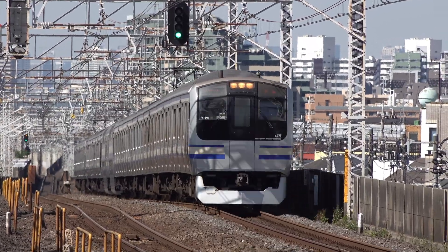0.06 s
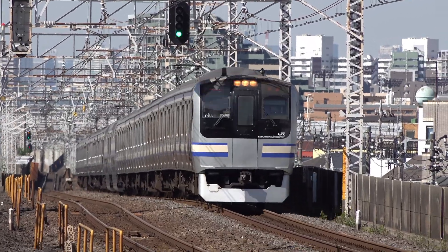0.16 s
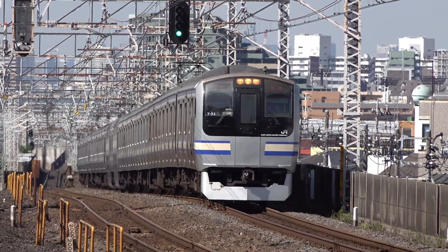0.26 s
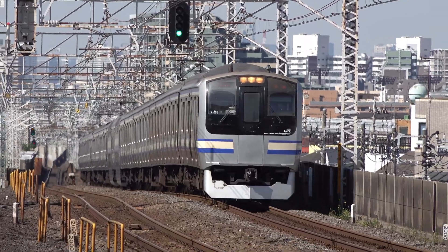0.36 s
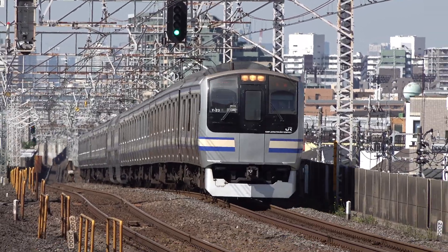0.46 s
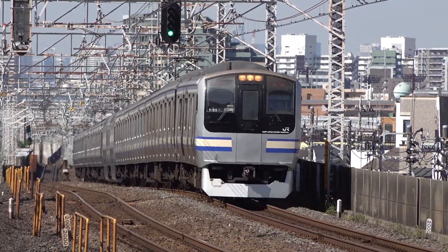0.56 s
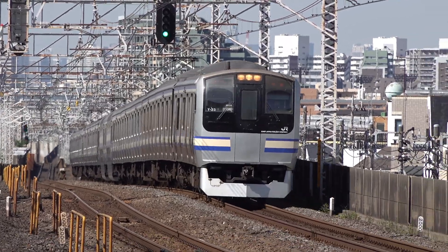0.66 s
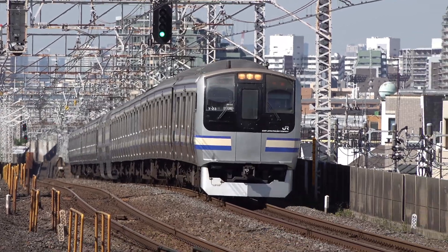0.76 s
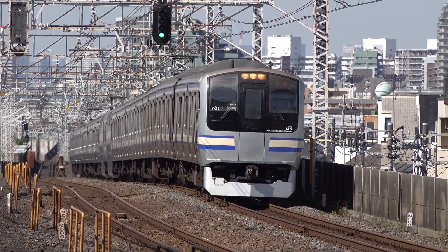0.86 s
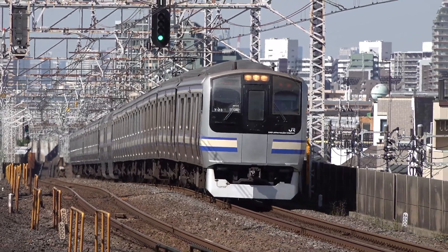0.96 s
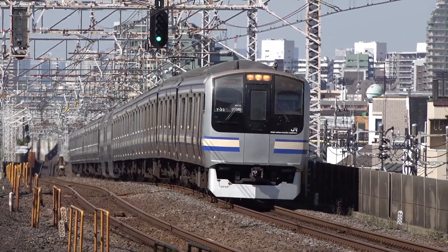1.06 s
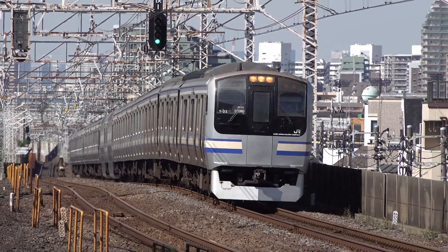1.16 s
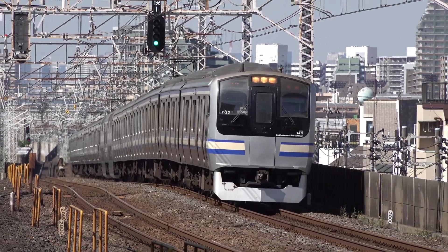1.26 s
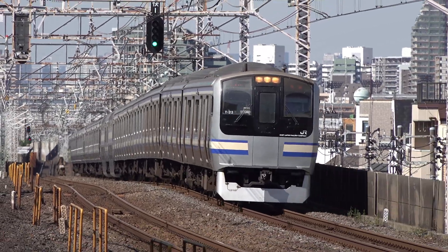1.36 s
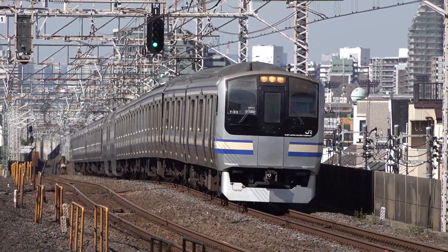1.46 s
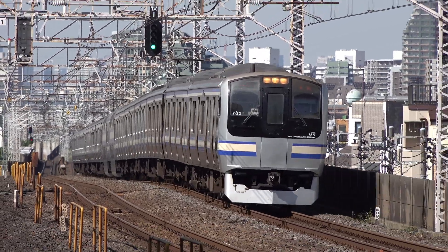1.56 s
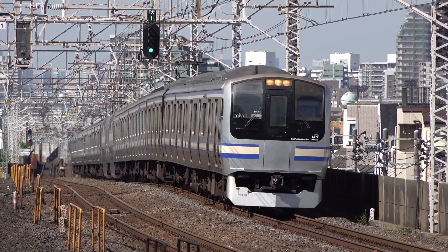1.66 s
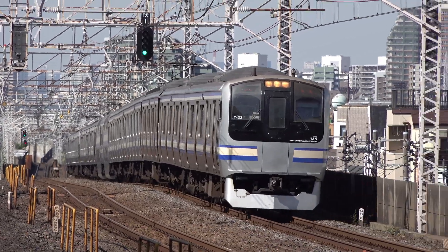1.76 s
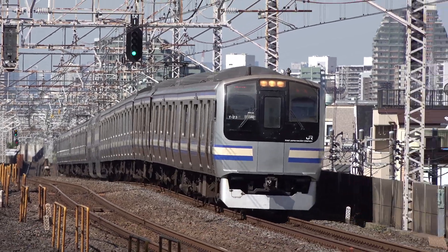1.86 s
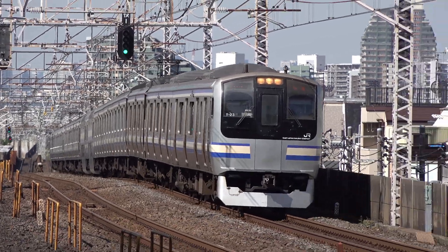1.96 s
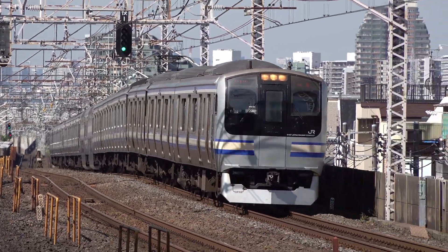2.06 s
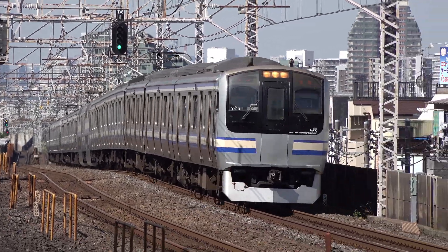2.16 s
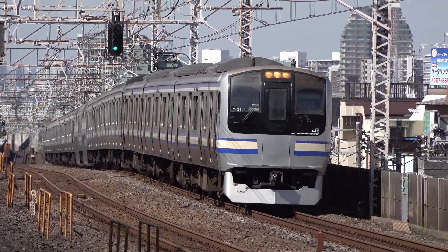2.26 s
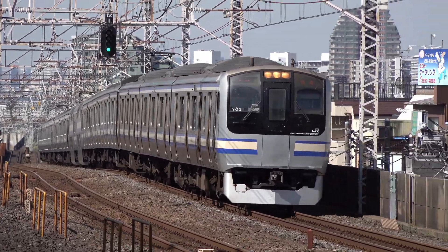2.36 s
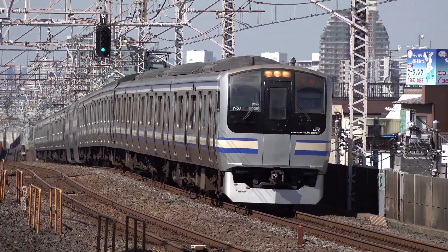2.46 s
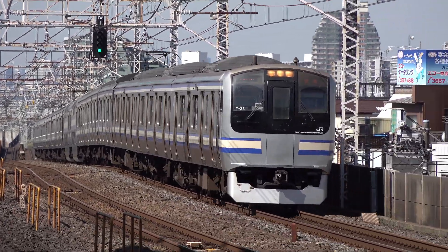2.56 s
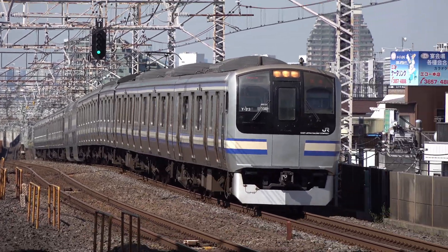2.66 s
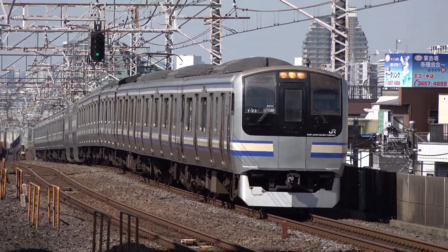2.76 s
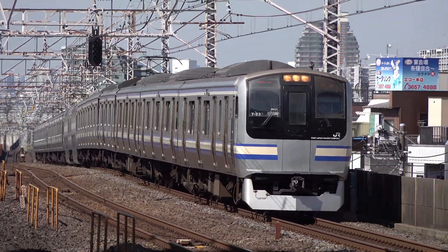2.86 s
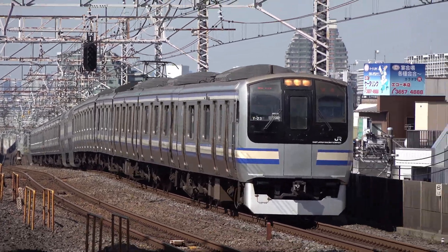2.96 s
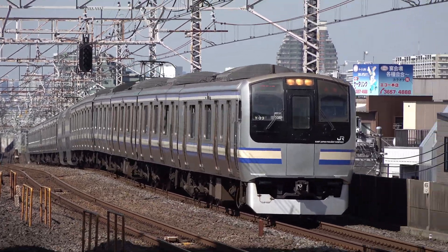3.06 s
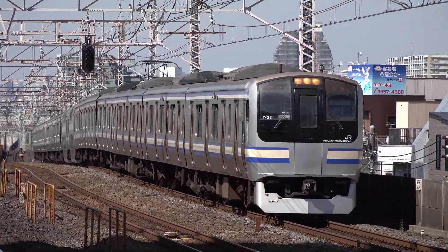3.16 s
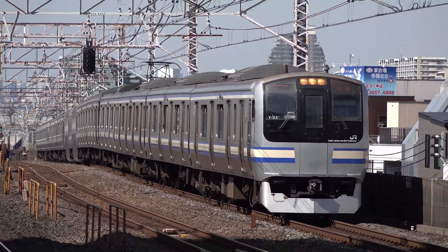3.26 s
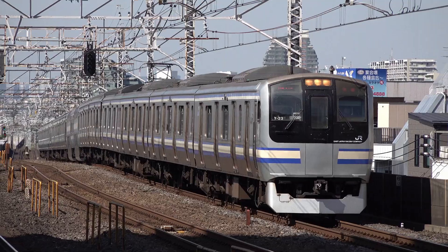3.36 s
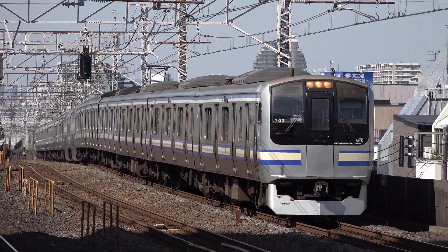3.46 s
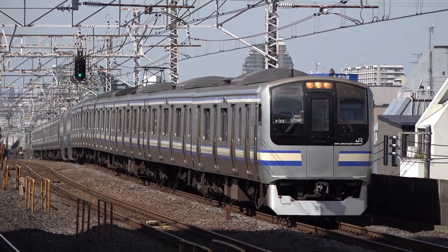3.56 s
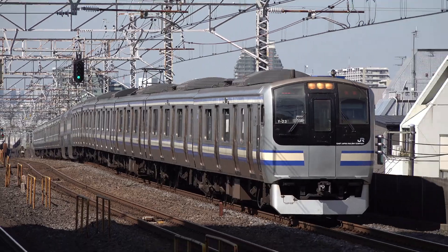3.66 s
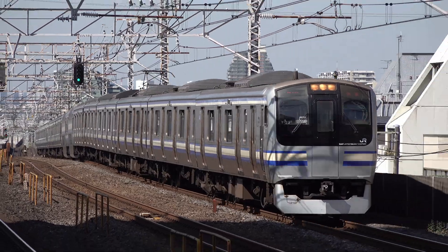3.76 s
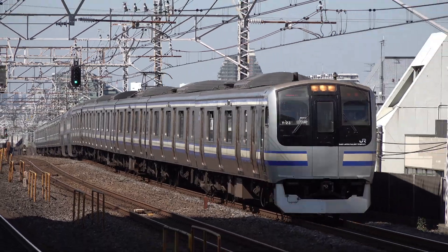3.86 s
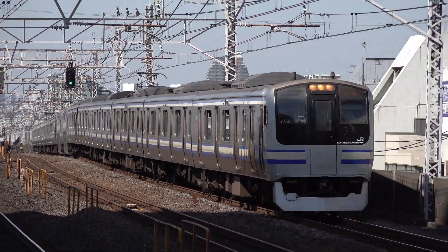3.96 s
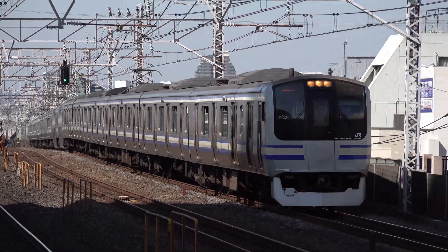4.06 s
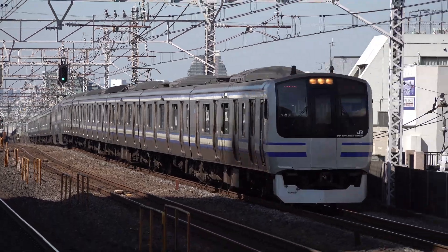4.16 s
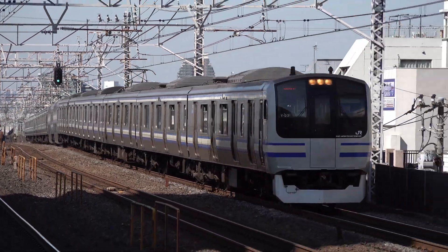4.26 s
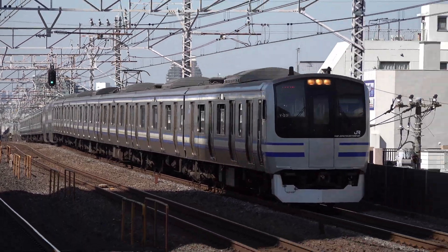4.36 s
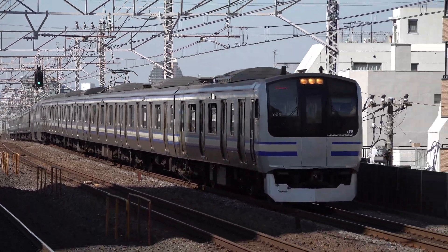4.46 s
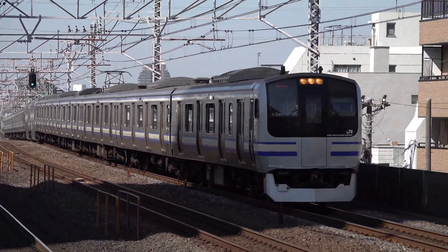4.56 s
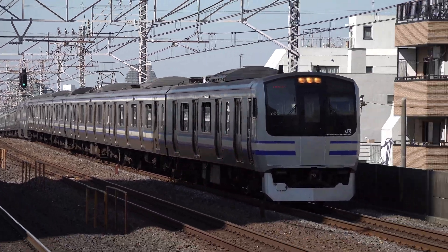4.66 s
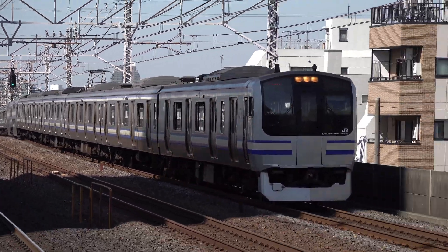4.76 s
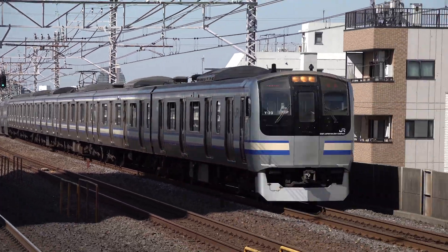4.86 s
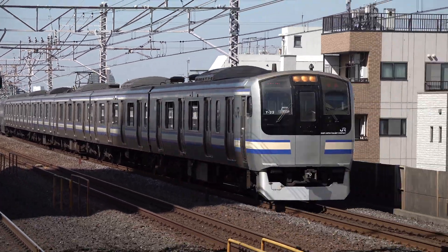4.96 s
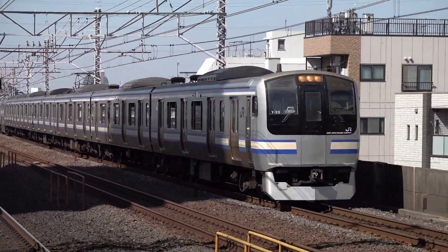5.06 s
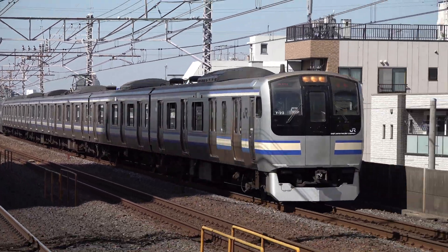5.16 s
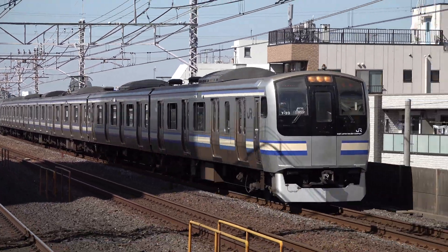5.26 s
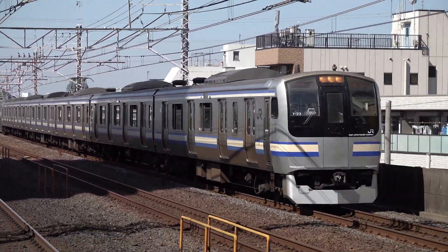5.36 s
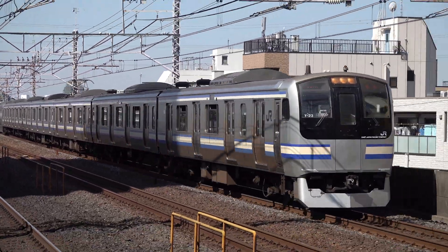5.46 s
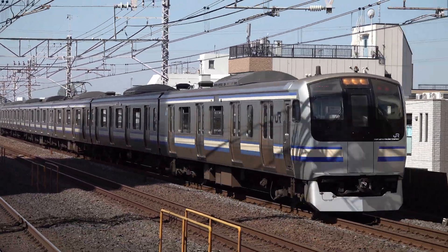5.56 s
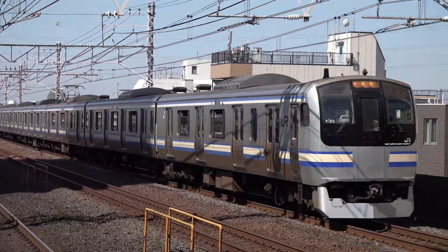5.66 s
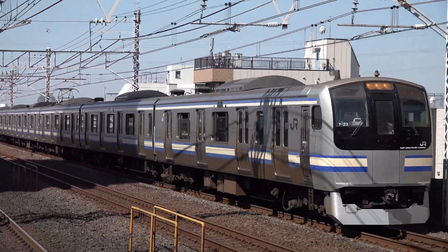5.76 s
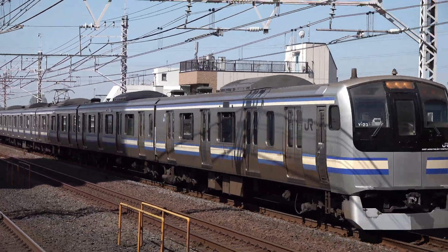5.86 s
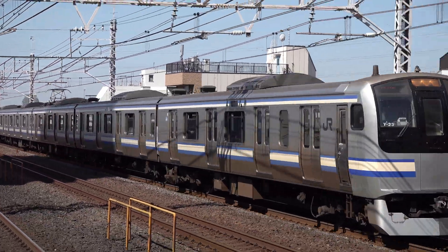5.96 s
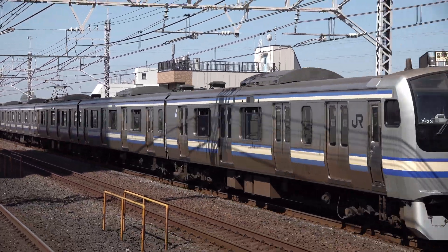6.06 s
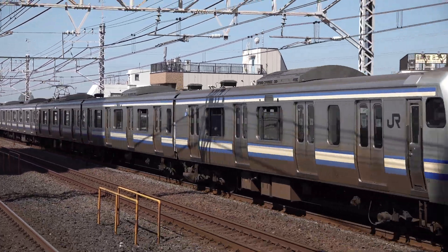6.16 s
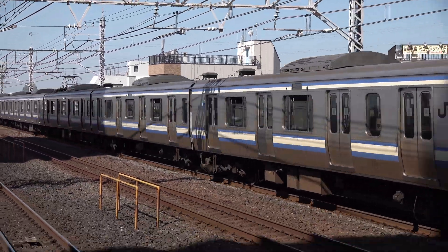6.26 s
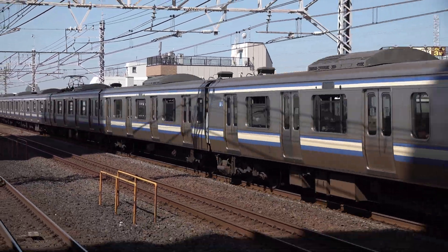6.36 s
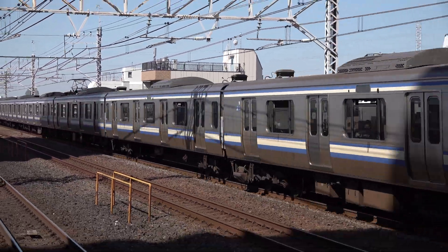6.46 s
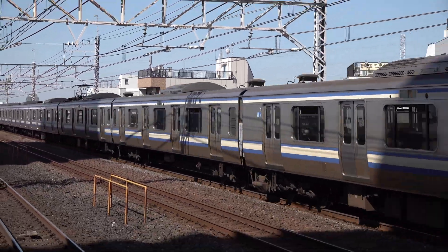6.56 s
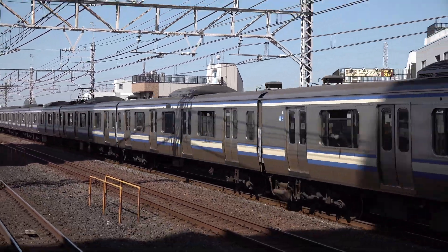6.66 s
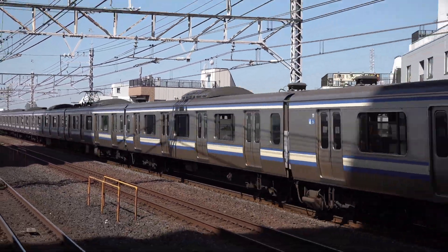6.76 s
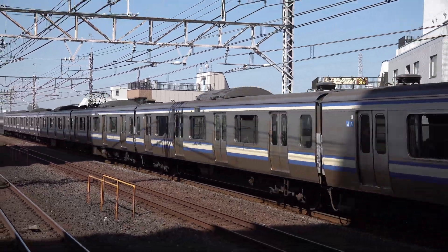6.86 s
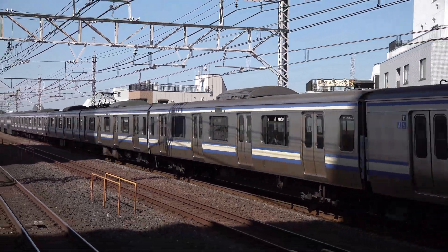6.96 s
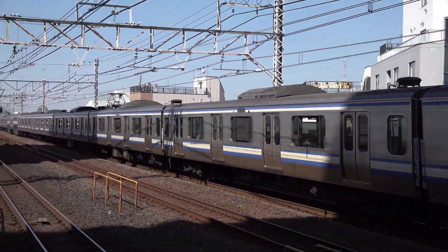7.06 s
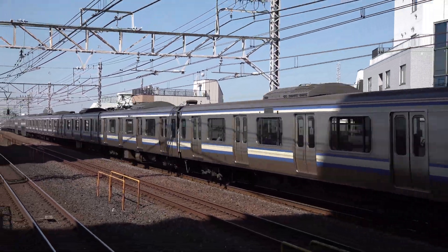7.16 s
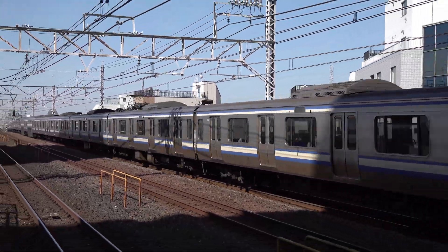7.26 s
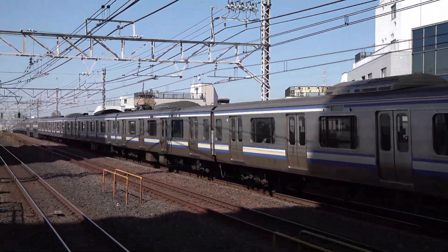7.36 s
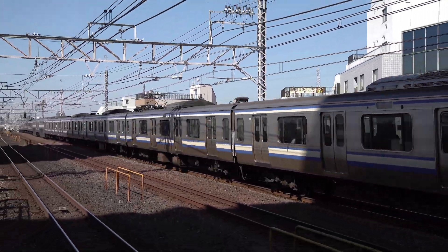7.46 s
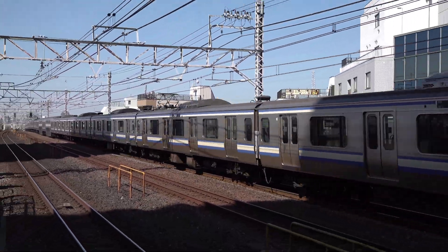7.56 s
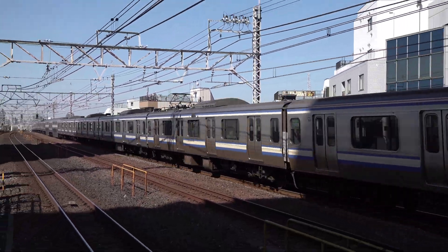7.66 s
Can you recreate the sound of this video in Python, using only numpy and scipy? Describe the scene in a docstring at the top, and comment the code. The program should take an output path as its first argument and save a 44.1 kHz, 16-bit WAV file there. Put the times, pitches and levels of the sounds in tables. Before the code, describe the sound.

Two cameras fire rapid shutter bursts as an electric train approaches and passes close by, rumbling, with singing rails and ringing wheels.

```python
"""A steady distant wash is heard first, and over it two cameras fire bursts with mechanical shutters.
An electric commuter train comes round a curve from the left and runs past a few metres away.
Rail roughness drives the resonances of rails and wheels at every bogie, so the rails sing and the
wheels ring over rumble and rolling roar. By the Doppler effect each bogie's pitch drops as it passes."""
import sys
import numpy as np
from scipy import signal
from scipy.fft import irfft, next_fast_len
from scipy.io import wavfile
from scipy.ndimage import uniform_filter1d

SR = 44100
rng = np.random.default_rng(int(sys.argv[2]) if len(sys.argv) > 2 else 0)


def master(y):
    """Save y as 16-bit WAV."""
    cut = np.clip(np.atleast_2d(y).T, -1, 1)
    pcm = np.round(cut * 32767)  # scale
    wavfile.write(sys.argv[1], SR, pcm.astype(np.int16))


N = 339129
TIME = np.arange(N) / SR
SPEED_M_PER_S, TRACK_DISTANCE_M = 22.5, 8.5
ABREAST_S = 7.15  # the first bogie draws level


def undb(db):
    """Amplitude ratio: tenfold for every 20 dB."""
    return 10 ** (np.asarray(db) / 20)


def pan(left_db):
    """Direction by level difference: left and right gains."""
    return undb(np.array([[.5], [-.5]]) * left_db)


def colour(points):
    """Spectral envelope: gain against frequency through (Hz, dB) points."""
    hz, db = np.transpose(points)
    return lambda f: undb(np.interp(np.log(f), np.log(hz), db))


def resonances(modes):
    """Modal response: steep-skirted peaks (Hz, width in Hz, dB) add in power."""
    return lambda f: np.sqrt(sum(undb(2 * db) / (1 + (1.09 * (f - hz) / width) ** 2) ** 2
                                 for hz, width, db in modes))


# Stereo width. Each row: frequency in Hz, level of side against mid in dB.
SIDE_SPECTRUM = [(30, -22), (120, -17), (300, -14), (700, -11), (1300, -8), (3000, -11), (6000, -11),
                 (9000, -10), (12000, -13)]
def noise(response, size=N, spread=1):
    """Filtered stereo noise of rms 1; coherence between the ears is highest in the bass."""
    n = next_fast_len(size, True)
    f = np.maximum(np.arange(n // 2 + 1) * SR / n, 1)
    gain = response(f) * f / np.hypot(f, 16)
    mid, side = rng.standard_normal((2, 2 * len(f))).view(complex) * gain
    side = side * spread * colour(SIDE_SPECTRUM)(f)
    x = irfft([mid + side, mid - side], n)[:, :size]
    return x / np.std(x)


def walk(rate_hz):
    """Slow random modulation: held steps, smoothed twice, with a spread near 1."""
    k = int(SR / rate_hz)
    steps = np.repeat(rng.standard_normal(N // k + 1), k)
    return 1.7 * uniform_filter1d(uniform_filter1d(steps, k), k)[:N]


def add(out, start_s, x):
    """Superposition: a short sound adds to the mix."""
    i = int(start_s * SR)
    out[:, i:i + x.shape[1]] += x


def struck(response, decay_s, size=4096):
    """Damped vibration: a blow of set strength dies away in the colour of the struck part."""
    t = np.arange(size) / SR
    envelope = np.exp(-t / decay_s) * (1 - np.exp(-t / 0.0006))
    blow = noise(response, size) * envelope
    return blow * np.std(envelope) / np.std(blow)


# Far cars and town. Each row: frequency in Hz, relative spectral density in dB.
WASH_SPECTRUM = [(20, -2), (48, 0.5), (80, -8), (115, -4), (165, -11.5), (350, -11), (700, -14.5),
                 (1300, -15.5), (1700, -23.5), (2200, -24), (3400, -40.5), (4600, -36), (5500, -46),
                 (7300, -54.5), (15500, -50)]
def distant_wash():
    """Many far sources add incoherently into a steady wash; a faint wavering hum fades within it."""
    wash = noise(colour(WASH_SPECTRUM), spread=0.3) * pan(0.22) * undb(-39 + 0.58 * walk(5.95))
    hum_hz = 344 + 1.34 * walk(4.84)
    hum_db = np.interp(TIME, [2.2, 3.5], [-51, -60]) + 1.5 * walk(9.9)
    return wash + np.sin(2 * np.pi * np.cumsum(hum_hz) / SR) * undb(hum_db)


# Light knocks nearby. Each row: start in seconds, level in dB.
KNOCK_HITS = [(1.31, -34), (3.297, -28), (3.319, -34), (3.38, -32), (3.398, -33)]
def knocks():
    """Each impact excites one damped resonance, which sounds hollow."""
    out = np.zeros((2, N))
    for start_s, db in KNOCK_HITS:
        add(out, start_s, undb(db) * struck(resonances([(1230, 160, 0)]), decay_s=0.016))
    return out


def shutter(frames, strokes, spectrum, ring_width_hz, scatter_db=0.7):
    """Impact excitation: every stroke of every frame sounds the camera body and rings one small part."""
    out = np.zeros((2, N))
    for frame_s in frames:
        for offset_s, db, decay_s, ring_hz, ring_db in strokes:
            body = struck(colour(spectrum), decay_s)
            ring = undb(ring_db) * struck(resonances([(ring_hz, ring_width_hz, 0)]), decay_s)
            add(out, frame_s + offset_s, (body + ring) * undb(db + scatter_db * rng.standard_normal()))
    return out


# The far camera's body. Each row: frequency in Hz, relative spectral density in dB.
CLACK_SPECTRUM = [(500, -31), (1200, -1), (1800, -11), (2500, 3), (3300, -9), (4500, -5.5), (5400, -8),
                  (6600, -4), (7600, -22), (8600, -34)]
# Its strokes. Each row: offset from the frame in seconds, relative level in dB, decay time in seconds,
# ring frequency in Hz, level of the ring against the body in dB.
CLACK_STROKES = [(0, 0, 0.013, 1710, -1), (.02, -4, 0.0062, 1450, 1), (.042, -5, .004, 2000, -8)]
def far_camera():
    """A periodic train of impacts from the farther, duller shutter, a little to the left."""
    frames = 2.734 + 0.0812 * np.arange(10)  # seconds
    return undb(-32) * shutter(frames, CLACK_STROKES, CLACK_SPECTRUM, ring_width_hz=180) * pan(2.1)


# Gear whirr. Each row: frequency in Hz, relative spectral density in dB.
WHIRR_SPECTRUM = [(800, -7), (2000, 1.5), (3200, -5), (4000, -3), (4800, 3), (6200, -7.5), (7500, -14.5),
                  (9800, -25), (11000, -23), (15500, -32)]
# Motor runs. Each row: offset from the frame in seconds, length in seconds, relative level in dB.
WINDING_RUNS = [(-0.056, 0.058, 0.5), (0.012, 0.058, 1)]
def winding_motor(frames, tooth_hz=206.5, depth=0.29, ramp_s=0.0075, sag_db_per_s=92):
    """Amplitude modulation: gear teeth chop the whirr as the motor re-cocks the shutter."""
    out = np.zeros((2, N))
    for offset_s, length_s, db in WINDING_RUNS:
        t = np.arange(0, length_s + ramp_s, 1 / SR)
        envelope = np.clip(np.minimum(t, t[-1] - t) / ramp_s, 0, 1) * undb(db - sag_db_per_s * t)
        for frame_s in frames:
            teeth = 1 + depth * np.sin(2 * np.pi * (tooth_hz * t + rng.random()))
            whirr = noise(colour(WHIRR_SPECTRUM), size=8192)[:, :len(t)]
            add(out, frame_s + offset_s, whirr * teeth * envelope)
    return out


# The near camera's body. Each row: frequency in Hz, relative spectral density in dB.
CLICK_SPECTRUM = [(100, -40), (600, -17), (1800, 0.5), (2900, -9.5), (4400, -7), (5400, -6), (6300, -3.5),
                  (7500, -14.5), (9300, -13.5), (11000, -23.5), (15500, -23)]
# Mirror and curtain strokes. Each row: offset from the frame in seconds, relative level in dB,
# decay time in seconds, ring frequency in Hz, level of the ring against the body in dB.
CLICK_STROKES = [(-.0705, -14, 0.0014, 6400, -2), (-.028, -13.5, 0.0027, 6000, -8),
                 (0, 1, 0.0023, 4460, -0.5), (.009, -4, 0.0016, 4570, -5),
                 (0.0287, -4.5, 0.0024, 4000, 0.5), (.038, -14, 0.014, 4090, 2),
                 (0.053, -17.5, 0.0056, 4750, 7)]
def near_camera():
    """Periodic impacts of mirror and curtains on the left, with two motor runs to a frame."""
    frames = 1.9777 + 0.14291 * np.arange(10)  # seconds
    clicks = undb(-24) * shutter(frames, CLICK_STROKES, CLICK_SPECTRUM, ring_width_hz=200)
    return (clicks + undb(-40) * winding_motor(frames)) * pan(4.7)


def approach(db, reach_m, falloff, lead_m=0):
    """Inverse power law of distance: the gain grows, then holds once the train is within lead_m."""
    ahead_m = np.maximum(SPEED_M_PER_S * (ABREAST_S - TIME) - lead_m, 0)
    return undb(db) * np.hypot(1, ahead_m / reach_m) ** -falloff


def swell(centre_s, half_length_s, db):
    """Gain of a Gaussian rise or dip in level."""
    return undb(db * np.exp(-((TIME - centre_s) / half_length_s) ** 2))


def bearing():
    """The level difference swings from left to right as the train arrives."""
    return pan(np.interp(TIME, [5.9, 6.9], [.6, -2.8]))


# The track bed. Each row: frequency in Hz, relative spectral density in dB.
RUMBLE_SPECTRUM = [(20, -12), (32, -2.5), (47, 10), (70, 0), (110, -2.5), (200, -15.5), (500, -48),
                   (3000, -82)]
def ground_rumble():
    """Ground vibration radiates bass, most strongly as the head of the train arrives."""
    gain = approach(db=-38, reach_m=42, falloff=0.62) * swell(centre_s=6.85, half_length_s=0.45, db=12)
    return noise(colour(RUMBLE_SPECTRUM), spread=0.6) * gain * pan(0.28)


# The car bodies. Each row: frequency in Hz, relative spectral density in dB.
ROAR_SPECTRUM = [(70, -12.5), (180, 1.5), (300, -1), (520, -3), (800, -6), (1500, -17), (8000, -78)]
def car_roar():
    """Broadband radiation from the cars reaches full strength ahead of the first bogie."""
    gain = approach(db=-27.5, reach_m=5.85, falloff=0.78, lead_m=12.8)
    return noise(colour(ROAR_SPECTRUM), spread=0.67) * gain * undb(0.61 * walk(10))


# Rolling noise. Each row: frequency in Hz, relative spectral density in dB.
RUSH_SPECTRUM = [(300, -16), (600, -2.5), (900, -4.5), (1250, 0), (1700, -5), (2500, -6), (3400, -11),
                 (5000, -16), (8000, -44), (14000, -39)]
def rolling_rush():
    """Rolling radiates a fluttering midrange noise that grows as the distance shrinks."""
    gain = approach(db=-26.5, reach_m=24.8, falloff=1.434)
    return noise(colour(RUSH_SPECTRUM)) * gain * bearing() * undb(1.55 * walk(7.8))


# Wheel on rail. Each row: frequency in Hz, relative spectral density in dB.
HISS_SPECTRUM = [(2000, -17), (3400, 0.5), (4300, 9.5), (5200, 4), (5800, -5), (6500, -4), (8000, -10.5),
                 (9200, -12.5), (10200, -17), (10900, -24), (15000, -36)]
def contact_hiss(contact_gain):
    """Contact noise: the wheels radiate a treble hiss where they meet the rail."""
    return noise(colour(HISS_SPECTRUM)) * contact_gain * bearing() * undb(0.44 * walk(9.2))


# The bogies. Each row: distance behind the first in metres, relative level in dB.
BOGIE_LAYOUT = [(0, 0.5), (13.8, 4.5), (20, -2.5), (33.8, -0.5), (40, 3.5), (53.8, 1), (60, 0), (77, 5),
                (97, 6), (120, 7.5)]
def bogie_paths(falloff, facing=0.23):
    """Retarded time: when each bogie's sound left it (the Doppler glide), and its share in each ear."""
    paths, power = [], 0
    c = 343  # speed of sound, m/s
    closing = c * c - SPEED_M_PER_S ** 2
    for behind_m, db in BOGIE_LAYOUT:
        along_m = SPEED_M_PER_S * (ABREAST_S - TIME) + behind_m
        root = np.sqrt((along_m * c) ** 2 + closing * TRACK_DISTANCE_M ** 2)
        travel_s = (along_m * SPEED_M_PER_S + root) / closing
        distance_m = c * travel_s
        # the microphone faces up the track, so bogies that have gone by drop away quickly
        gain = undb(db) * distance_m ** -falloff * (1 + facing * along_m / distance_m)
        paths.append((TIME - travel_s, gain * pan(1.3 - 5.1 * TRACK_DISTANCE_M / distance_m)))
        power = power + gain ** 2
    return [(emitted_s, gain / np.sqrt(power)) for emitted_s, gain in paths]


def rolling(modes, paths, detune, patchy_db, size=2 ** 19):
    """Forced vibration: patchy roughness drives the modes at each bogie; unequal wheels detune them."""
    source, out = noise(resonances(modes), size), 0
    for k, (emitted_s, gain) in enumerate(paths):
        place = emitted_s * SR * (1 + detune * rng.uniform(-1, 1)) + k * size / len(paths)
        i = np.floor(place).astype(int)
        before, after = (source.take(j % size, axis=1) for j in (i, i + 1))
        shifted = before + (place - i) * (after - before)
        out = out + gain * undb(patchy_db * walk(7)) * shifted
    return out


def sustained(x, hold_s):
    """A steadily driven resonance keeps sounding: its running power is partly evened out."""
    power = uniform_filter1d(np.mean(x ** 2, axis=0), int(hold_s * SR))
    return x / np.sqrt(power + 0.32)


# The rail's main note and its octave. Each row: frequency at rest in Hz, width in Hz, relative dB.
RAIL_NOTE = [(660, 19, -1), (700, 33, -7.5)]
RAIL_OCTAVE = [(1335, 7.7, -0.5), (1400, 28, -9.5)]
# Rough and smooth track. Each row: centre in seconds, half length in seconds, level change in dB.
RAIL_STRETCHES = [(5.535, 0.32, 3.5), (6.36, 0.043, -6), (6.622, 0.025, 3.5), (6.779, 0.034, 6.5),
                  (6.95, 0.066, -5)]
def singing_rails():
    """A resonant rail is a waveguide: it carries sound ahead, so far bogies count for more."""
    paths = bogie_paths(falloff=0.91)
    roughness = np.prod([swell(*row) for row in RAIL_STRETCHES], axis=0)
    note = sustained(rolling(RAIL_NOTE, paths, detune=.006, patchy_db=1), hold_s=0.095)
    octave = sustained(rolling(RAIL_OCTAVE, paths, detune=.006, patchy_db=1), hold_s=0.17)
    return (note * approach(db=-18.6, reach_m=22.7, falloff=2.24) * roughness
            + octave * approach(db=-28.5, reach_m=29.2, falloff=1.99))


# Main and high wheel modes. Each row: frequency at rest in Hz, width in Hz, relative level in dB.
WHEEL_RING = [(1867, 71, -5.5), (1970, 31, 1.5), (2036, 33, -1), (2094, 44, -5.5), (2664, 79, -9),
              (2779, 43, -7.5), (3340, 33, -21), (4010, 110, -15.5), (4123, 41, -9.5), (4870, 170, -23)]
WHEEL_HIGH_RING = [(5370, 130, 0.5), (5770, 50, -1), (6360, 60, -8), (7200, 44, -11), (7760, 25, -7),
                   (8400, 39, -13), (9160, 30, -24)]
# Ringing up on the curve. Each row: centre in seconds, half length in seconds, level rise in dB.
CURVE_SWELLS = [(4.33, 0.2, 3), (5.05, 0.12, 1.5), (6.35, 0.1, 1.5)]
def ringing_wheels(contact_gain):
    """Wheels radiate their modes as moving point sources; the first three bogies add high overtones."""
    paths = bogie_paths(falloff=1.2)
    curve = np.prod([swell(*row) for row in CURVE_SWELLS], axis=0)
    ring = sustained(rolling(WHEEL_RING, paths, detune=.008, patchy_db=2), hold_s=0.34)
    overtones = rolling(WHEEL_HIGH_RING, paths[:3], detune=.002, patchy_db=2)
    return (ring * approach(db=-18.5, reach_m=27, falloff=2.406) * curve
            + overtones * contact_gain * undb(-11))


def scene():
    """Superposition of surroundings, cameras and train."""
    background = distant_wash() + knocks() + far_camera() + near_camera()
    contact_gain = approach(db=-26, reach_m=23, falloff=2.47)
    train_noise = ground_rumble() + car_roar() + rolling_rush() + contact_hiss(contact_gain)
    return background + train_noise + singing_rails() + ringing_wheels(contact_gain)


def record(dry):
    """Mid-side filtering: the close-set microphone widens the high treble; the recorder cuts the top."""
    mid, side = (dry[0] + dry[1]) / 2, (dry[0] - dry[1]) / 2
    side = side + 1.64 * signal.lfilter(*signal.iirpeak(8700, 3.5, fs=SR), side)
    low_pass = signal.ellip(10, .2, 80, 15600, fs=SR, output="sos")
    return signal.sosfilt(low_pass, [mid + side, mid - side])


dry = scene()
out = record(dry)
master(out)
```